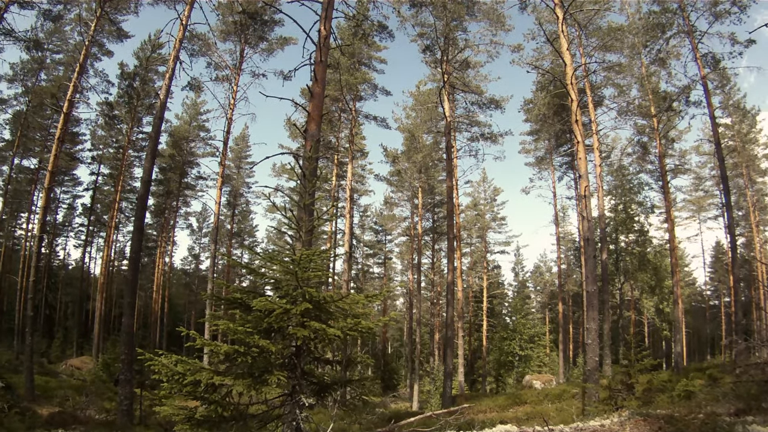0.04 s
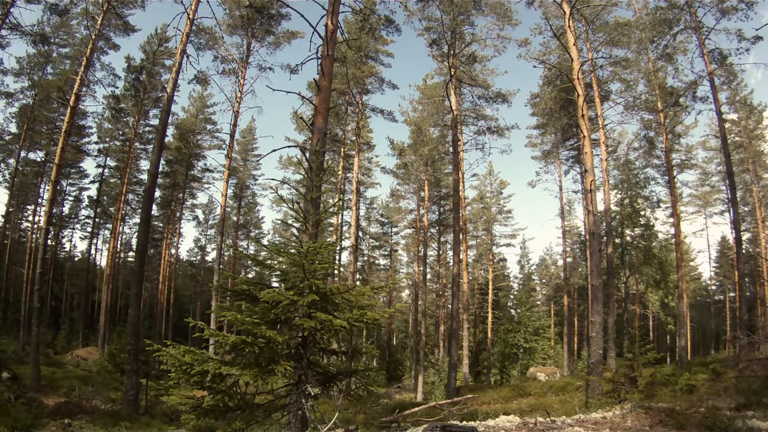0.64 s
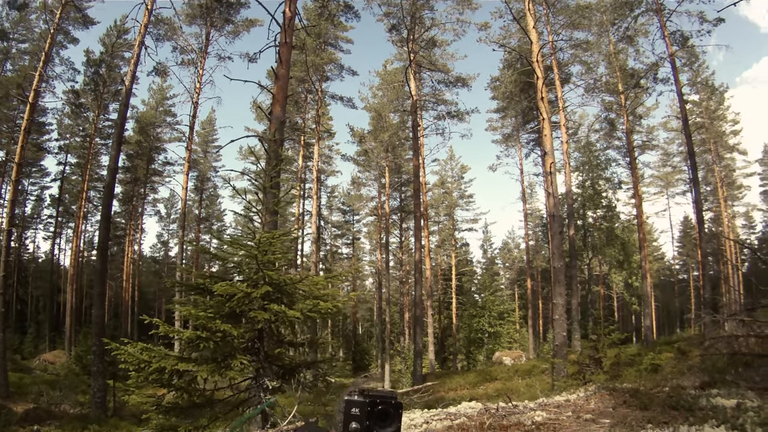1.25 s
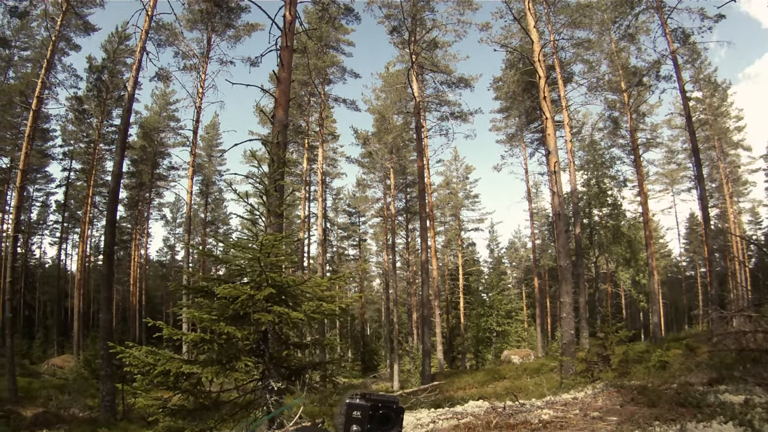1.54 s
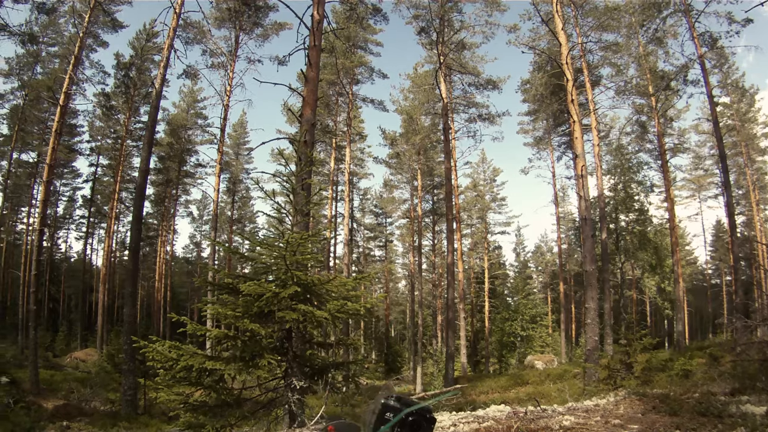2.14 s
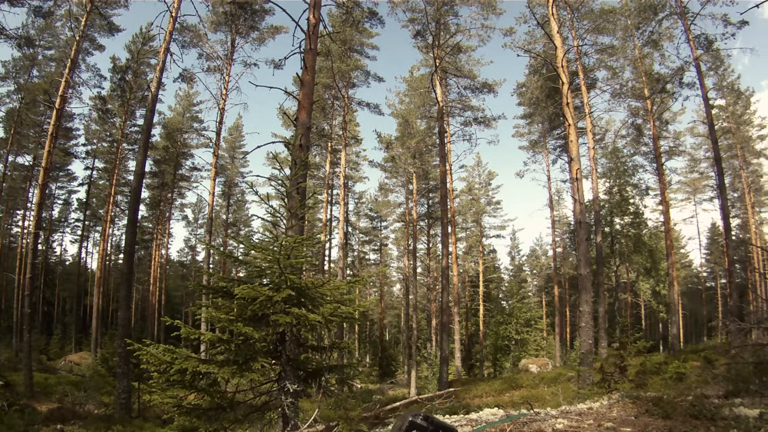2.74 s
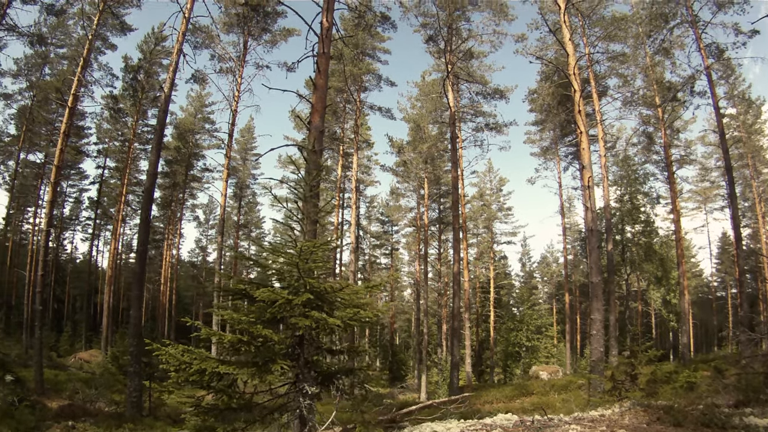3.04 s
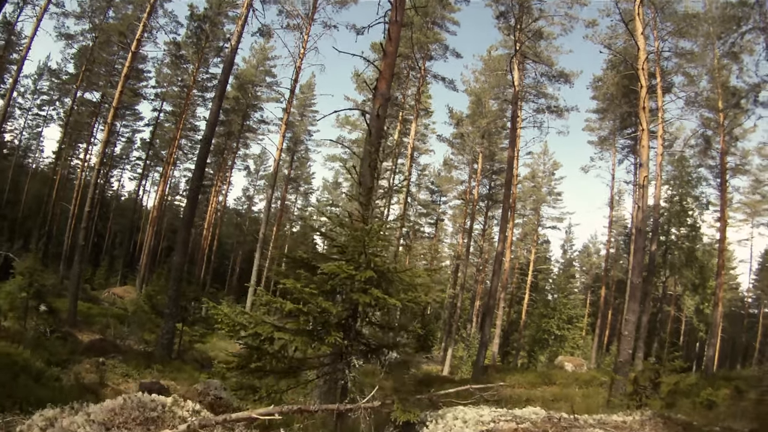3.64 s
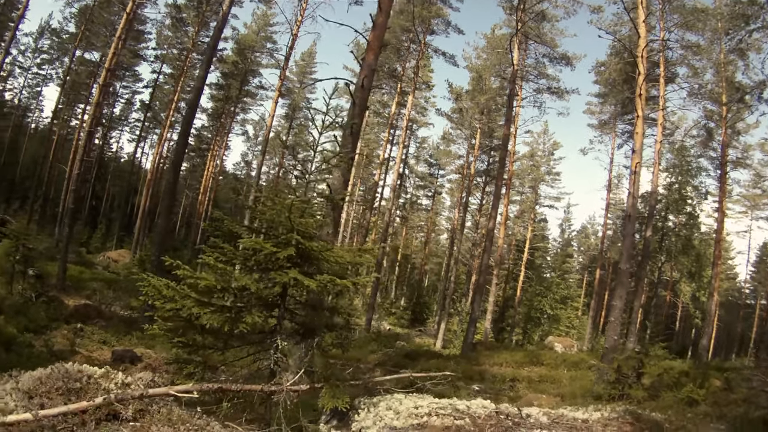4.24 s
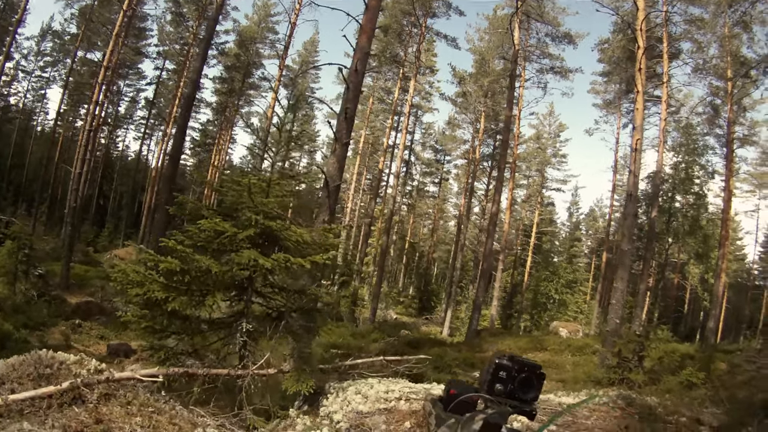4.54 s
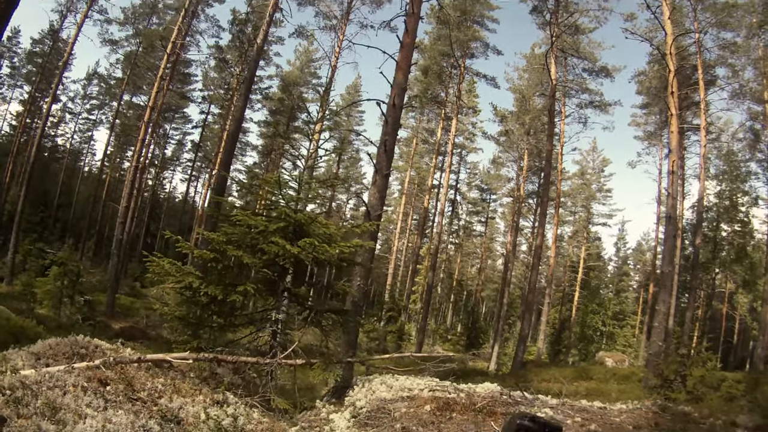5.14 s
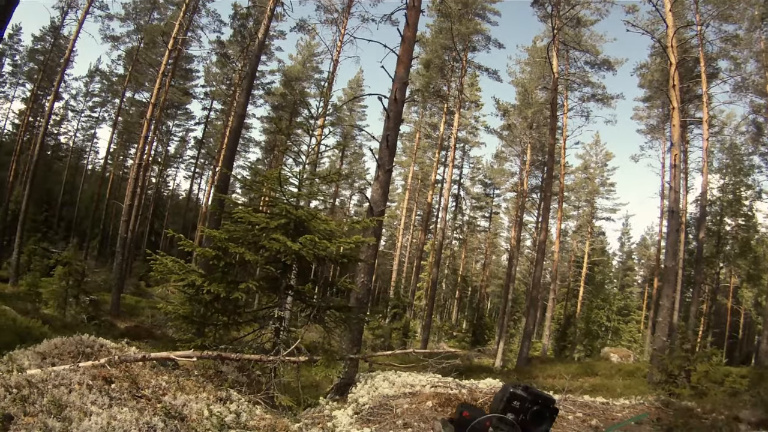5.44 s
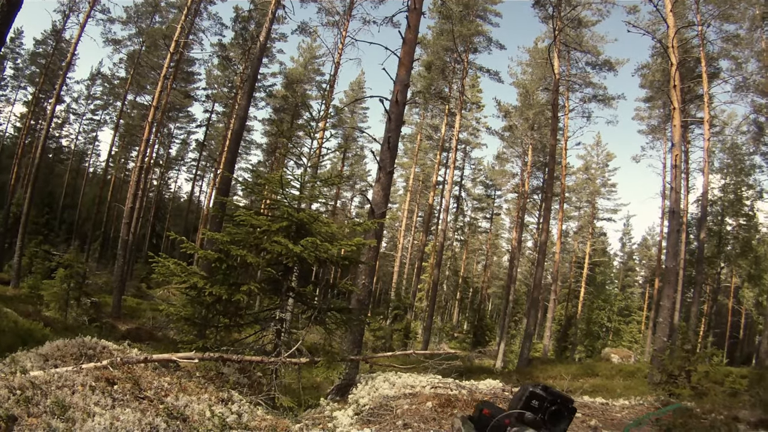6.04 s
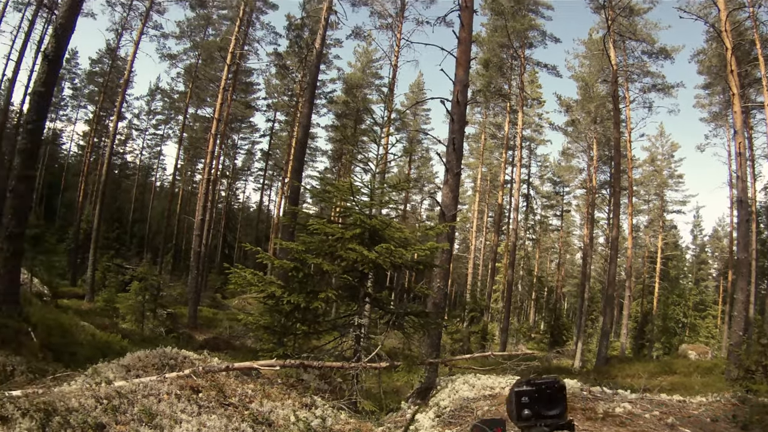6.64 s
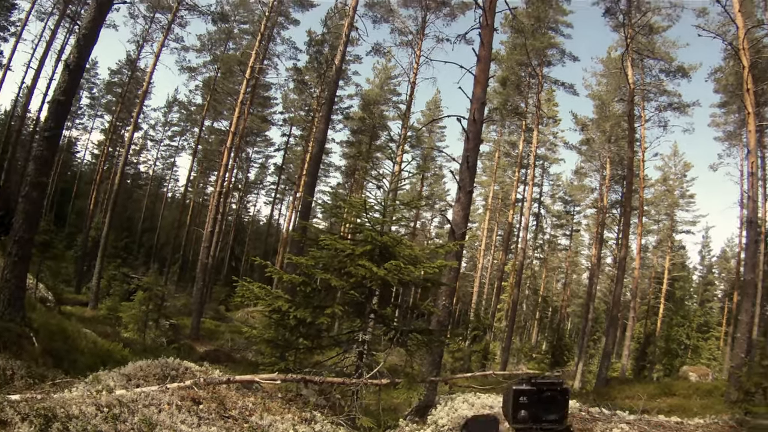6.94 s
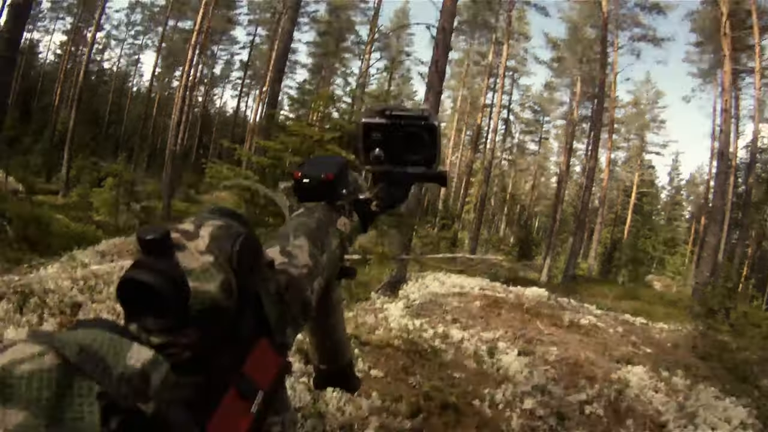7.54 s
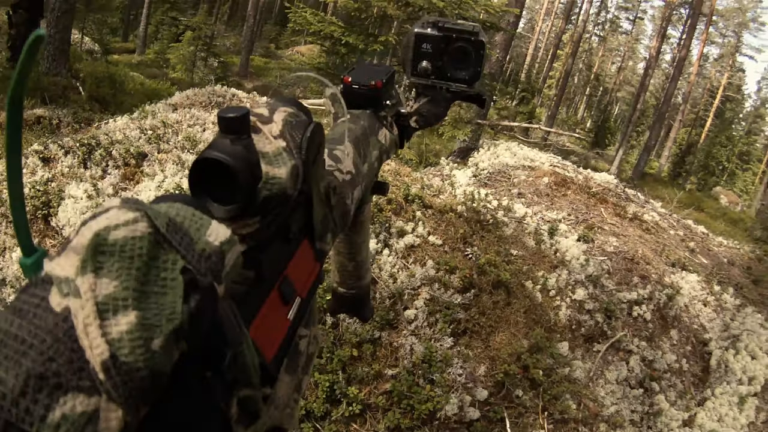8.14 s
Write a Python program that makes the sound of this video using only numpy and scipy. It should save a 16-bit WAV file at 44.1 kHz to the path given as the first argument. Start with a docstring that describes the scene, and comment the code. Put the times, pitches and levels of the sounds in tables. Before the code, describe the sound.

An electric airsoft rifle fires five whirring full-auto bursts close up in a forest, the last shots hollow, followed by gear knocks and rustling.

```python
"""An electric airsoft rifle, heard close up in a pine forest. Kit knocks and cloth rustles, then a
neighbour's rifle opens with four sharp pops. Ours answers with five full-auto bursts: in each the motor
spins up, the gears whine and grind, and the spring slams the piston home, shot after shot, while the
trunks scatter the sound. The magazine runs out, so the last six shots land hollow. To finish, the rifle
is handled: knocks, metal ticks, strap scrapes and rustling over a faint hush of air."""
import sys
import numpy as np
from scipy import signal
from scipy.fft import rfft, irfft
from scipy.io import wavfile
from scipy.ndimage import uniform_filter1d

SR = 44100
rng = np.random.default_rng(int(sys.argv[2]) if len(sys.argv) > 2 else 0)


def wrap_up_sound(samples):
    """Save the sound to the file named by the first command line argument, as 16-bit audio."""
    columns = np.atleast_2d(samples).T
    # keep every value between -1 and 1, then stretch to whole-number steps
    tamed = np.clip(columns, -1, 1)
    steps = np.round(tamed * 32767).astype(np.int16)
    wavfile.write(sys.argv[1], SR, steps)


N = 365588
TIME = np.arange(N) / SR

# trigger pulls: on_s, off_s, first_slam_s, cycle_s, spin_up_lag_s, spin_up_stretch_factor,
# start_jolt_db, start_whine_db, hiss_db
BURSTS = [(1.033, 1.702, 1.1089, .07243, .0068, 1.24, 2.5, 0, -1),
          (1.849, 2.757, 1.9447, .07251, .0031, .94, -3.5, 2.5, -1.5),
          (2.86, 3.089, 2.9571, .0726, .003, 1.05, -1.5, -1, -2),
          (4.721, 6.135, 4.8208, .07267, .0015, 1., 8, .5, 0),
          (6.244, 6.484, 6.3428, .0723, .0053, 1.12, -5, 3.5, 2)]
# the motor gaining speed: after_trigger_s, mesh_hz, whine_db, grind_and_hiss_db
SPIN_UP = [(0, 691, -56, -17.5), (.008, 1009, -30.5, -5.5), (.018, 1373, -26, 4.5), (.028, 1696, -19, -1.5),
           (.04, 1930, -19.5, -0.5), (.06, 2150, -33, 0.5), (.078, 2112, -29, -2), (.1, 2418, -30, -1.5)]
# the spring's load on the gears through one stroke: before_slam_s, grind_db, hiss_db, whine_db, speed_factor
SPRING_LOAD = [(0, 2, -4.5, -17, 1.), (.011, -3.5, -7, -10, .95), (.016, -2.5, -5, -1, .96),
               (.021, -1, 2, 6, .99), (.028, -2, -1, -2, 1.02), (.036, -2, -1, -7, 1.04),
               (.046, -1, 1, -7, 1.), (.056, -2.5, -2, -8, .85), (.073, -2, -4, -12.5, 1.)]
# resonances of the gearbox shell: pitch_hz, width_hz, level_db
SHELL_MODES = [(402, 60, -40.5), (1262, 170, -35.5)]
# colours of the running gears: frequency_hz, level_db
GRIND_EQ = [(40, -31.5), (150, -36), (300, -16.5), (400, -10), (540, -10.5), (640, 0), (950, -1),
            (1280, 6.5), (1480, 7), (1700, 7.5), (2500, 2.5), (2950, -15), (3600, -29.5), (9000, -53.5)]
HISS_EQ = [(1500, -23.5), (3000, 0.5), (3500, -6), (4100, 5.5), (4700, -3), (5500, 3), (6400, 0.5),
           (8700, 0.5), (10500, -7), (11700, -16.5), (13800, -21), (15300, -51)]

# the piston lands and bounces twice: after_landing_s, gain_factor
PISTON_CONTACTS = [(0, 0.64), (.0015, 0.39), (.0023, .29)]
# rack teeth slipping off before the slam, and a bounce after it: from_slam_s, level_db
RACK_RATTLE = [(-.0091, -9), (-.0078, -4), (-.0065, -4), (-.0052, 0.5), (.0086, -2)]
# colours of a loaded slam, an empty slam, a rack tooth and the spring's thump: frequency_hz, level_db
LOADED_SLAM_EQ = [(80, -21.5), (200, -12.5), (310, 27), (430, 22.5), (640, 16), (950, 15.5), (1300, 25),
                  (1600, 6.5), (2350, 15.5), (2900, -16), (4100, -0.5), (4700, -14.5), (9000, -5.5),
                  (15000, -40.5)]
EMPTY_SLAM_EQ = [(80, -7.5), (190, 11), (270, 31), (470, 26.5), (640, 29.5), (850, 11.5), (1300, 25.5),
                 (1550, 13), (2250, 20), (3400, -2.5), (4100, 6), (4700, -0.5), (9000, -3), (15000, -47.5)]
TOOTH_EQ = [(100, -11), (400, 11.5), (900, 8), (1400, 8), (1900, 12), (2600, 12.5), (3300, -5), (5500, -10),
            (9500, -21), (15000, -40)]
RECOIL_EQ = [(25, -1), (60, -0.5), (130, 12), (280, 13), (450, 15.5), (800, 4), (2000, -28.5), (8000, -57)]

# the neighbour's shots: start_s, level_db
NEIGHBOUR_SHOTS = [(.7948, 1.5), (0.8743, 1.5), (.9531, 1), (1.0323, 1)]
# the neighbour's motor: time_s, whine_hz, level_db
NEIGHBOUR_MOTOR = [(.725, 2100, -65), (.76, 2120, -38.5), (.79, 1900, -44.5), (.81, 2250, -38.5),
                   (.92, 2330, -39), (1.03, 2300, -38.5), (1.05, 1900, -78.5)]
# colours of the neighbour's muzzle pop, its body and the gears: frequency_hz, level_db
POP_EQ = [(60, -4.5), (180, 18), (330, 30.5), (900, 18.5), (1600, 15), (2200, 17.5), (2900, 11), (3400, 14),
          (4600, 9), (6100, 13.5), (9000, 2), (12000, -32.5), (16000, -21)]
POP_BODY_EQ = [(60, -9), (200, 5), (380, 21.5), (1000, 14), (1500, 11), (2300, 14.5), (2900, -0.5),
               (6000, 0), (14000, -23)]
FAR_GEARS_EQ = [(60, -32.5), (250, 0.5), (500, 0), (2200, 2.5), (3000, -11), (4000, -14.5), (8000, -13),
                (12000, -35), (16000, -40)]

# rifle and kit bumping: start_s, level_db, ring_hz, clack_db, treble_db, t60_s
KNOCKS = [(.015, -7, 1850, -18, -21, .022), (.346, -21, 1190, -26, -46, .031),
          (.443, -19.5, 2080, 0, -14.5, .023), (.628, -29, 1600, 2, -17, .05),
          (.674, -23.5, 826, 3.5, -39, .028), (.728, -18, 810, -2, -24, .054),
          (3.546, -34.5, 1240, -28, -8.5, .042), (4.126, -33, 864, -18, -32, .043),
          (4.339, -22.5, 460, -2, -44, .034), (4.4, -22, 441, 1, -34, .067),
          (4.458, -17, 600, -37, -41, .08), (4.475, -11, 457, -35, -50, .098),
          (4.51, -15.5, 678, -39, -50, .077), (7.132, -29.5, 1860, 1.5, -13, .03),
          (7.176, -31.5, 398, 1, -34, .094), (7.305, -20, 500, -7, -33, .089),
          (7.316, -9, 1050, -6, -30, .033), (7.33, -16.5, 985, -4, -29, .028),
          (7.519, -23.5, 1190, -20, -15.5, .072), (7.622, -6, 720, -.5, -19, .051),
          (7.657, -11.5, 1100, -9, -22, .058), (7.808, -13.5, 700, -16, -36, .068),
          (7.833, -16.5, 370, -7, -25, .06), (7.866, -23.5, 400, -10, -21, .05),
          (7.964, -24, 705, 0, -20, .12), (8.226, -24.5, 416, -4, -35, .059)]
# colours of a knock's plastic clack and bright tick: frequency_hz, level_db
CLACK_EQ = [(300, -36.5), (900, 3.5), (1300, 5.5), (2300, 4.5), (3000, -35), (6000, -26.5), (12000, -52)]
KNOCK_TREBLE_EQ = [(300, -44), (1500, -29.5), (3000, -14), (4300, 4.5), (6000, 2.5), (8200, 4.5),
                   (10000, -4.5), (16000, -31)]
# small metal parts snapping into place: start_s, level_db
METAL_TICKS = [(.018, -19), (.13, -42), (.445, -36), (.63, -42), (3.286, -51), (3.549, -29), (4.621, -41),
               (4.674, -39), (4.701, -38), (6.96, -50), (7.522, -31.5), (7.997, -38)]
# their undamped ring: pitch_hz, level_db, t60_s
METAL_MODES = [(4250, 0, 0.02), (5001, -14, 0.03), (5680, -12, 0.026), (6600, 0, 0.02), (8100, 13, 0.018),
               (9400, 7, 0.018)]
# a strap dragged over stiff fabric: start_s, length_s, level_db
SCRAPES = [(7.138, .02, -48), (7.266, .045, -42), (7.708, .04, -44.5), (7.82, .03, -43)]
# colour of one slip of the strap: frequency_hz, level_db
SLIP_EQ = [(500, -22), (1200, -6), (1900, 1), (2600, -2), (3200, -11), (4000, -9), (6000, -16), (9000, -26),
           (15000, -48)]
# the shooter's movements, each a swell of rubbing cloth: peak_s, rise_s, fall_s, body_db, fizz_db
MOVES = [(.2, .3, .15, -53, -69), (.47, .11, .17, -41.5, -66), (3.4, .1, .17, -57, -80),
         (3.8, .08, .25, -55, -78.5), (4.22, .08, .09, -52, -70), (4.41, .08, .07, -38, -64.5),
         (4.66, .13, .1, -44, -65), (6.78, .1, .25, -64.5, -81), (7.17, .03, .07, -53, -80),
         (7.31, .03, .03, -43, -64), (7.48, .11, .12, -47, -66), (7.75, .08, .17, -43.5, -58.5),
         (8.16, .15, .2, -51, -61)]
# colours of the cloth's soft body and its fizz: frequency_hz, level_db
CLOTH_EQ = [(25, -32), (60, -19), (120, -8), (230, -1.5), (400, 2.5), (750, 1.5), (1300, 0), (2100, -5.5),
            (3000, -18), (4500, -30), (9000, -60)]
FIZZ_EQ = [(2000, -19), (3300, -2), (4100, 3), (5000, 0), (8500, 5.5), (10500, -4), (12000, -7),
           (15000, -9), (16000, -20)]

# decay of the forest's echo: frequency_hz, t60_s
FOREST_DECAY = [(100, .42), (400, .45), (1400, .58), (3000, .5), (7000, .5), (14000, .4)]
# colours of that echo and of the still air: frequency_hz, level_db
FOREST_EQ = [(80, -33), (400, -13), (1400, -12.5), (2600, -22), (5000, -11.5), (9000, -6.5), (15000, -5.5)]
AIR_EQ = [(30, -14), (120, 0), (500, 2), (1200, -3), (2500, -17), (4000, -21), (9000, -19), (15000, -27)]


def gearbox(grind_db=-25.5, hiss_db=-35, overtone_db=-23, jolt_s=.049, brake_s=.0035):
    """The motor spins up; the gears whine, grind and hiss, surging as each stroke draws the spring."""
    slams = np.sort([s for s, _, _ in strokes()])
    until_slam = slams[np.minimum(np.searchsorted(slams, TIME), len(slams) - 1)] - TIME
    load_db, rasp_db, sing_db, speed = follow(SPRING_LOAD, until_slam)
    shell = sum(amp(db) * unit(ring(rng.standard_normal(N), hz, width)) for hz, width, db in SHELL_MODES)
    shell = signal.lfilter(*signal.butter(2, 2500, fs=SR), shell)
    grain = amp(1.4 * waver(size=60))
    grinding = amp(grind_db + load_db) * noise(GRIND_EQ) * grain + shell
    hiss = amp(hiss_db + rasp_db) * shimmer(noise(HISS_EQ), db=2.1) * grain
    wobble, flutter = 1 + .011 * waver(size=100), amp(1.8 * waver(size=90))  # the teeth mesh unevenly
    speed = speed * (1 + .012 * waver(size=1500))  # no two strokes sing quite alike
    sing_db = sing_db + 2.2 * waver(size=1500)
    out = np.zeros(N)
    for on, off, *_, stretch, jolt_db, start_whine_db, bright_db in BURSTS:
        at = (TIME >= on) & (TIME < off + .02)
        age = (TIME[at] - on) / stretch
        hz, tone_db, run_db = follow(SPIN_UP, age)
        settled = np.clip((age - .07) / .033, 0, 1)  # at full speed the spring's load bends the pitch
        phase = 2 * np.pi * np.cumsum(hz * wobble[at] * speed[at] ** settled) / SR
        overtones = sum(np.sin(k * phase) / (k - 1) for k in range(2, 5))
        tone = (np.sin(phase) + amp(overtone_db) * overtones) * flutter[at]
        whine = amp(tone_db + settled * sing_db[at] + (1 - settled) * start_whine_db) * tone
        grit = amp(run_db) * (grinding[at] + amp(bright_db) * hiss[at])
        jolt = amp(jolt_db * np.exp(-(age / jolt_s) ** 4))
        brake = np.exp(-np.maximum(TIME[at] - off, 0) / brake_s)
        out[at] += (whine + grit) * jolt * brake
    return out


def piston(loaded_db=2.5, spread_db=1.1, rattle_db=-3, ring_db=-16.5):
    """The spring lets go with a thump, the rack rattles, the piston strikes and the shell rings on."""
    loaded, hollow = amp(loaded_db) * slam(LOADED_SLAM_EQ), slam(EMPTY_SLAM_EQ)
    tooth, thump, out = impact(TOOTH_EQ), impact(RECOIL_EQ), np.zeros(N)
    for s, stroke_db, empty in strokes():
        seal_db = spread_db * rng.standard_normal() * (not empty)  # each pellet seals differently
        strike = chatter(hollow if empty else loaded, db=-20, t60=.03)
        add(out, s - .00033, amp(stroke_db + seal_db) * strike)
        lead_s, thump_db = (.00514, -2) if empty else (.01363, -.3)
        add(out, s - lead_s, amp(thump_db) * chatter(thump, db=-10.5, t60=.018))
        for delay, tooth_db in RACK_RATTLE:
            duck_db = -8 if empty and delay < 0 else 0
            gain = amp(rattle_db + tooth_db + duck_db + rng.standard_normal())
            click_s = s + delay + .0002 * rng.standard_normal()
            add(out, click_s, gain * chatter(tooth, db=-4.5, t60=.007))
    return out + amp(ring_db) * ring(out, *SHELL_MODES[0][:2])


def slam(eq):
    """One landing of the piston: the same hit at each contact, a millisecond or so apart."""
    hit, out = impact(eq), np.zeros(4096)
    for delay, gain in PISTON_CONTACTS:
        add(out, delay, gain * hit)
    return out


def strokes(empty_s=5.94, early_s=.0082, empty_db=3.2, loaded_db=-.5, fade_db_per_s=2, settle=.22):
    """The firing rhythm, steady once the motor has gained speed. Rows: slam_s, level_db, is_empty."""
    rows = []
    for _, off, first, cycle, lag, *_ in BURSTS:
        shot = np.arange(round((off - first) / cycle) + 1)
        s = first + shot * cycle + lag * (1 - settle ** shot)
        empty = s > empty_s  # no pellet, no air cushion: the piston lands sooner and harder
        level_db = np.where(empty, empty_db, loaded_db - fade_db_per_s * (s - first))
        rows += zip(s - early_s * empty, level_db, empty)
    return rows


def neighbour_rifle(pop_db=-4.5, whine_db=-8, body_db=-5):
    """A second rifle: a faint motor, and muzzle pops made of a push and then a suck of air."""
    hz, motor_db = follow(NEIGHBOUR_MOTOR, TIME)
    phase = 2 * np.pi * np.cumsum(hz) / SR
    first_draw = np.exp(-np.maximum(TIME - NEIGHBOUR_SHOTS[0][0], 0) / .01)  # only this stroke sings
    whine = amp(whine_db) * first_draw * (np.sin(phase) + .5 * np.sin(2 * phase))
    running = (TIME > NEIGHBOUR_MOTOR[0][0]) & (TIME < NEIGHBOUR_MOTOR[-1][0])
    out = amp(motor_db) * (noise(FAR_GEARS_EQ) + whine) * running
    pop = comb(impact(POP_EQ), delay_s=.000385, gain=-.77)
    for s, db in NEIGHBOUR_SHOTS:
        add(out, s, amp(db + pop_db) * chatter(pop, db=-18, t60=.018))
        add(out, s + .000976, amp(db + body_db) * chatter(impact(POP_BODY_EQ), db=4.5, t60=.036))
    return out


def handling_knocks():
    """Rifle and kit bump as they are handled."""
    out = np.zeros(N)
    for s, *voicing in KNOCKS:
        add(out, s + .002, knock(*voicing))
    return out


def knock(db, hz, clack_db, treble_db, t60, q=1.6, size=6000):
    """A noisy bump in one broad resonance, topped by a shorter plastic clack and a bright tick."""
    t = np.arange(size) / SR
    eq = [(hz / 8, -34), (hz / 1.7, -8), (hz, 0),
          (hz * 2, -8), (hz * 2 + 2000, -32), (hz * 2 + 12000, -60)]
    body = noise(eq, size)
    body = unit(body + ring(body, hz, hz / q)) * amp(-9 - 60 * t / t60)
    clack = amp(clack_db - 7.5) * noise(CLACK_EQ, size)
    tick = amp(treble_db + 1) * noise(KNOCK_TREBLE_EQ, size)
    attack = 1 - np.exp(-t / .0003)
    return amp(db) * (body + (clack + tick) * amp(-60 * t / (.49 * t60))) * attack


def metal_ticks(damp_s=.0073):
    """Small metal parts snap into place; the hand chokes their ring at once."""
    t, out = np.arange(4096) / SR, np.zeros(N)
    tick = sum(amp(db - 60 * t / t60) * np.sin(2 * np.pi * hz * t) for hz, db, t60 in METAL_MODES)
    tick *= np.exp(-t / damp_s)
    for s, db in METAL_TICKS:
        add(out, s, amp(db) * chatter(tick / abs(tick).max(), db=-5, t60=.011))
    return out


def strap_scrapes(slips_per_s=1500):
    """The strap catches and slips in a quick run of tiny clicks."""
    click, out = impact(SLIP_EQ), np.zeros(N)
    for s, length, db in SCRAPES:
        size = round(length * SR)
        slips = rng.standard_normal(size) * (rng.random(size) < slips_per_s / SR)
        swell = np.sin(np.linspace(0, np.pi, size)).clip(0) ** .5
        add(out, s, amp(db) * unit(signal.fftconvolve(slips, click)[:size]) * swell)
    return out


def clothes(fizz_db=2.5, crinkle_db=2.5, folds_db=-14, folds_per_s=350):
    """Fabric rubs as the shooter shifts; folds snap as small separate grains and loose kit ticks."""
    body_gain, fizz_gain = movement()
    crinkle = amp(crinkle_db * waver(size=220))
    snaps = rng.uniform(-1.1, 1, N) * (rng.random(N) < folds_per_s / SR)
    folds = unit(signal.fftconvolve(snaps, impact(CLOTH_EQ))[:N])
    body = body_gain * (noise(CLOTH_EQ) + amp(folds_db) * folds)
    fizz = amp(fizz_db) * fizz_gain * shimmer(noise(FIZZ_EQ), db=2.2)
    return crinkle * (body + fizz) + loose_kit(body_gain)


def movement():
    """Envelopes for the cloth's body and fizz: each move swells and fades in a bell curve."""
    body, fizz = np.full(N, 1e-12), np.full(N, 1e-12)
    for s, rise, fall, body_db, fizz_db in MOVES:
        bell = np.exp(-np.minimum(((TIME - s) / np.where(TIME < s, rise, fall)) ** 2, 20))
        body += (amp(body_db) * bell) ** 2
        fizz += (amp(fizz_db) * bell) ** 2
    return np.sqrt(body), np.sqrt(fizz)


def loose_kit(cloth_gain, ticks_per_s=10, boost_db=14, spread_db=3, centre_hz=850, spread_octaves=.6):
    """Loose kit ticks at random, its level riding the movement that shakes it."""
    out = np.zeros(N)
    for slot, (when, strength, pitch) in enumerate(rng.uniform(-1, 1, (int(ticks_per_s * N / SR), 3))):
        hz = centre_hz * 2 ** (spread_octaves * pitch)
        tick = knock(boost_db + spread_db * strength, hz, clack_db=-4, treble_db=-19, t60=.045)
        add(out, (slot + abs(when)) / ticks_per_s, tick)
    return out * cloth_gain


def forest_echo(x, echoes_per_s=2500, build_s=.056, treble_reach_s=.18, treble_hz=2500):
    """Trunks return many small echoes that build up and die away; only the nearest return treble."""
    taps = rng.standard_normal(SR) * (rng.random(SR) < echoes_per_s / SR)
    hz, t, bands = signal.stft(taps, SR, nperseg=256)
    fade = amp(-60 * t / at_hz(FOREST_DECAY, hz)[:, None]) * (1 - np.exp(-t / build_s))
    fade *= np.exp(-(t / treble_reach_s) ** 4 * np.clip(hz / treble_hz - .5, 0, 1)[:, None])
    fade *= amp(at_hz(FOREST_EQ, hz))[:, None] / np.sqrt(np.mean(fade ** 2, 1, keepdims=True))
    tail = signal.istft(bands * fade, SR, nperseg=256)[1] / np.linalg.norm(taps)
    return signal.fftconvolve(x, tail)[:N]


def forest_air(level_db=-71):
    """The bed: a faint, steady hush of still air."""
    return amp(level_db) * noise(AIR_EQ)


def impact(eq, size=4096):
    """A sharp hit with the given colour, its energy packed at the front (minimum phase)."""
    log_gain = np.log(amp(at_hz(eq, abs(np.fft.fftfreq(size, 1 / SR)))))
    return np.fft.ifft(np.exp(np.conj(signal.hilbert(log_gain)))).real[:size // 2]


def chatter(x, db, t60, size=2048):
    """Loose parts answer a hit with a short random tail."""
    t = np.arange(size) / SR
    tail = rng.standard_normal(size) * amp(-60 * t / t60) * (1 - np.exp(-t / .00063))
    return x + amp(db) * signal.fftconvolve(x, tail / np.linalg.norm(tail))[:len(x)]


def ring(x, hz, width_hz):
    """The sound through one resonance."""
    return signal.lfilter(*signal.iirpeak(hz, hz / width_hz, SR), x)


def comb(x, delay_s, gain):
    """A sound plus one delayed copy."""
    shift = np.exp(-2j * np.pi * np.fft.rfftfreq(len(x), 1 / SR) * delay_s)
    return x + gain * irfft(rfft(x) * shift, len(x))


def noise(eq, size=N):
    """Noise of rms 1 with the given colour."""
    gain = amp(at_hz(eq, np.fft.rfftfreq(size, 1 / SR)))
    return unit(irfft(rfft(rng.standard_normal(size)) * gain, size))


def shimmer(x, db):
    """Shifts the colour at random from moment to moment; comes out at rms 1."""
    bands = signal.stft(x, nperseg=512)[2]
    patches = uniform_filter1d(rng.standard_normal(bands.shape), size=3, axis=0)
    patches = unit(uniform_filter1d(patches, size=3, axis=1))
    return unit(signal.istft(bands * amp(db * patches), nperseg=512)[1][:N])


def waver(size):
    """Random modulation of rms 1, smoothed over size samples."""
    return unit(uniform_filter1d(uniform_filter1d(rng.standard_normal(N), size), size))


def at_hz(curve, hz):
    """Reads a curve on a log-frequency axis."""
    frequencies, values = np.transpose(curve)
    return np.interp(np.log(hz + 1), np.log(frequencies), values)


def follow(rows, t):
    """Reads every automation lane of a table at the times t."""
    s, *lanes = np.transpose(rows)
    return [np.interp(t, s, lane) for lane in lanes]


def add(mix, s, sound):
    """Mixes a sound in at time s."""
    part = mix[max(round(s * SR), 0):][:len(sound)]
    part += sound[:len(part)]


def amp(db):
    """Decibels to gain."""
    return 10 ** (np.asarray(db) / 20)


def unit(x):
    """Scales to rms 1."""
    return x / np.sqrt(np.mean(x ** 2) + 1e-20)


def scene(gears_send_db=-.5, piston_send_db=-12, neighbour_send_db=-9.5, foley_send_db=-15):
    """The mono mix: the gears carry into the forest; the slams and small noises mostly stay close."""
    gears, slams, neighbour = gearbox(), piston(), neighbour_rifle()
    foley = handling_knocks() + strap_scrapes() + clothes()
    echo = forest_echo(amp(gears_send_db) * gears + amp(piston_send_db) * slams
                       + amp(neighbour_send_db) * neighbour + amp(foley_send_db) * foley)
    return (gears + slams + neighbour + foley + metal_ticks() + echo + forest_air())[None]


def record(dry, low_cut_hz=55, high_cut_hz=16300):
    """The microphone sheds deep bass and clips at full scale; a steep filter trims the very top."""
    low_cut = signal.butter(3, low_cut_hz, "high", fs=SR, output="sos")
    high_cut = signal.firwin(511, high_cut_hz, window=("kaiser", 9), fs=SR)
    clipped = np.clip(signal.sosfilt(low_cut, dry), -1, 1)
    return signal.oaconvolve(clipped, high_cut[None], "same")


dry = scene()
out = record(dry)
wrap_up_sound(out)
```